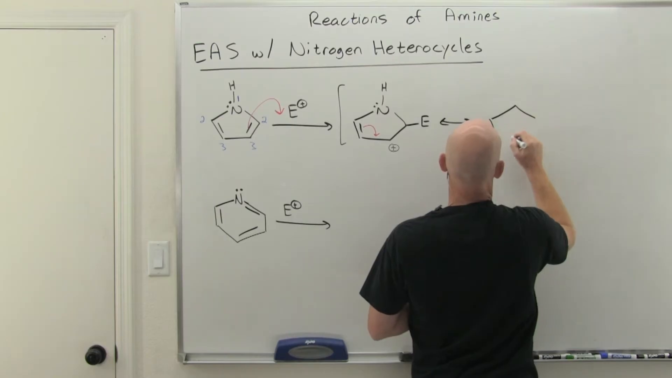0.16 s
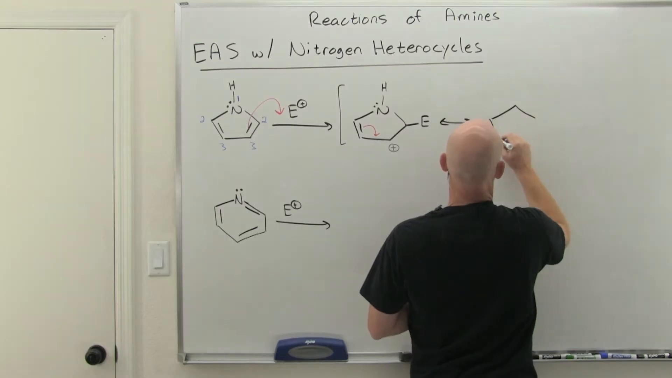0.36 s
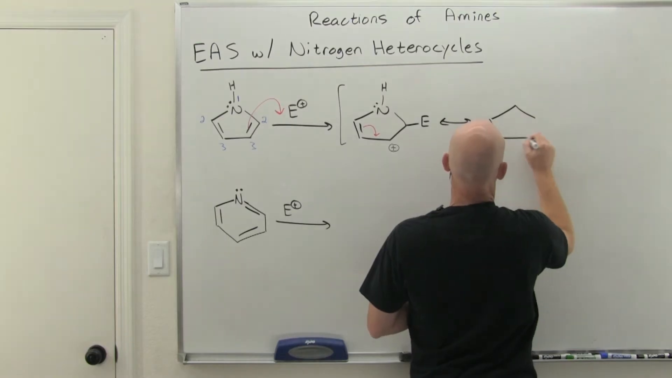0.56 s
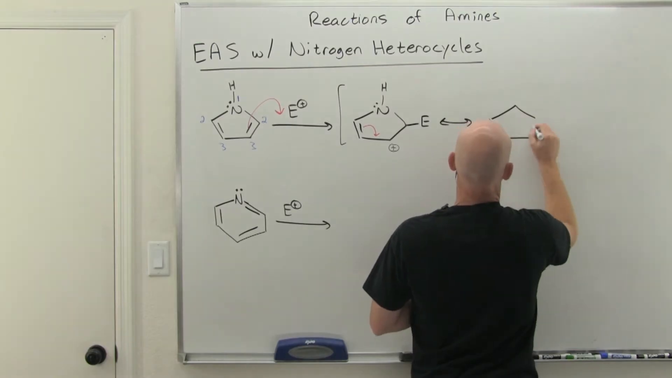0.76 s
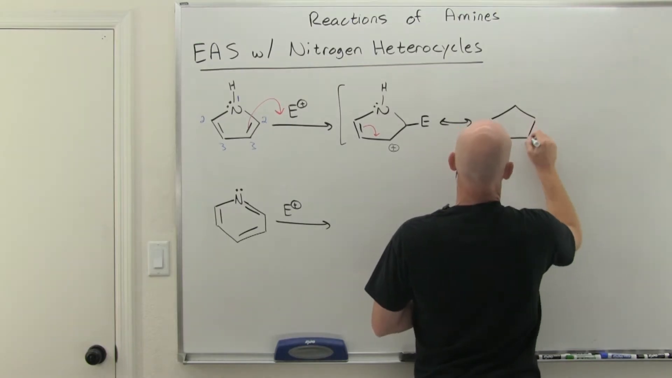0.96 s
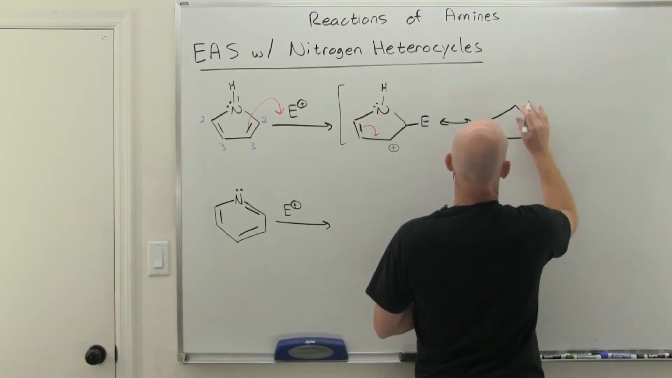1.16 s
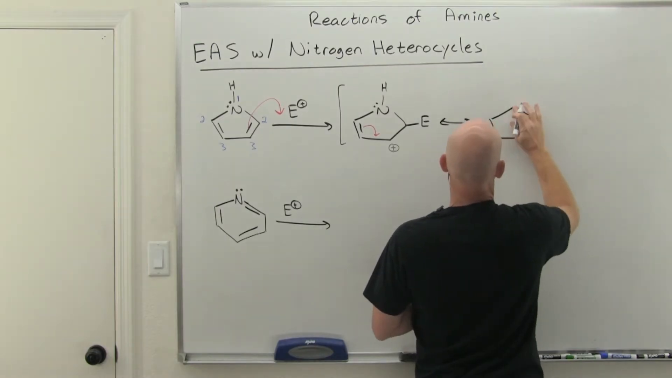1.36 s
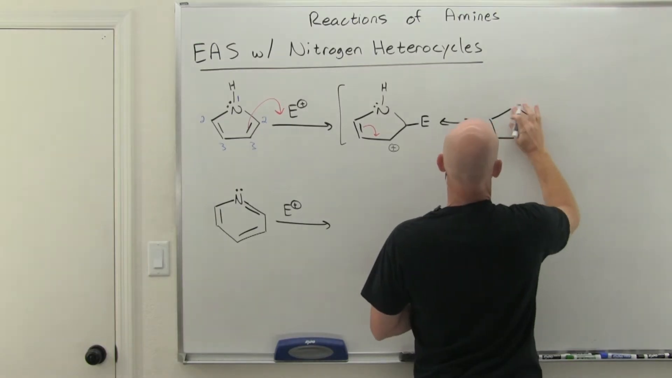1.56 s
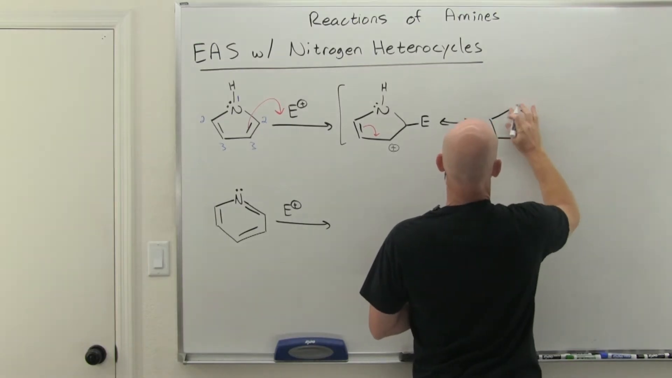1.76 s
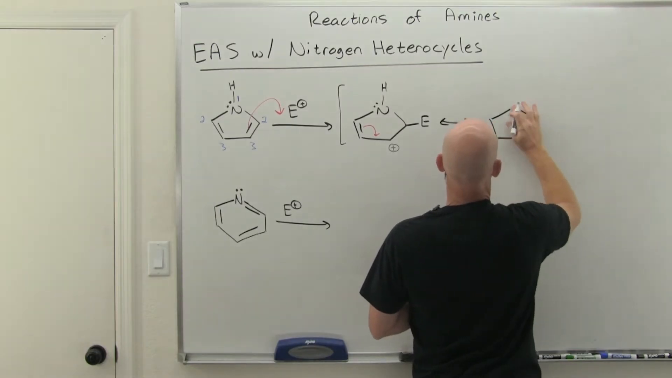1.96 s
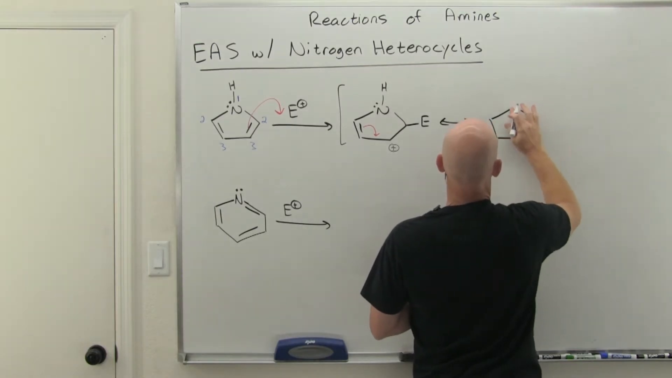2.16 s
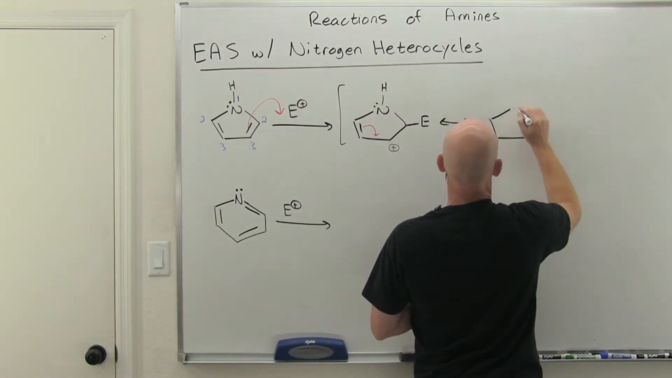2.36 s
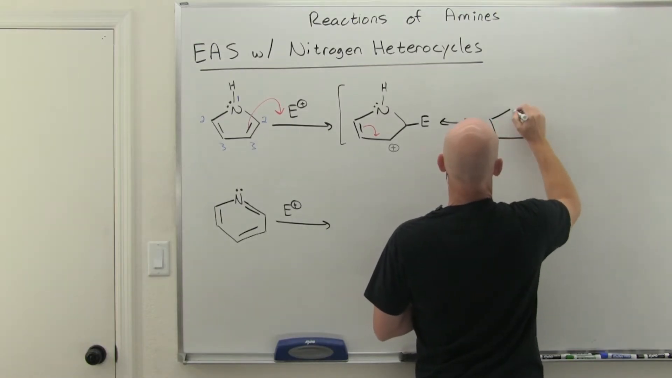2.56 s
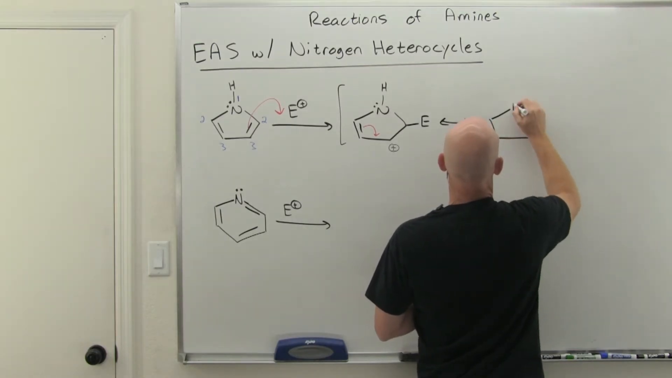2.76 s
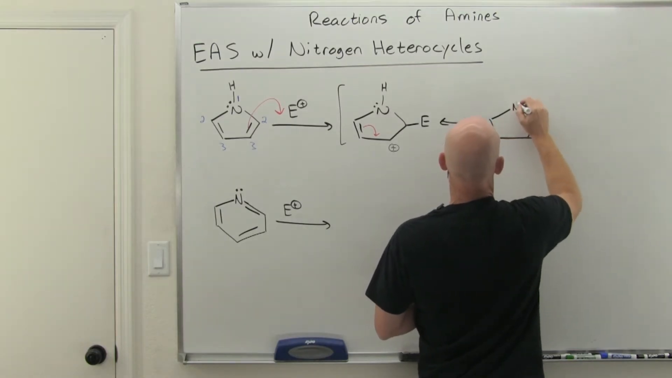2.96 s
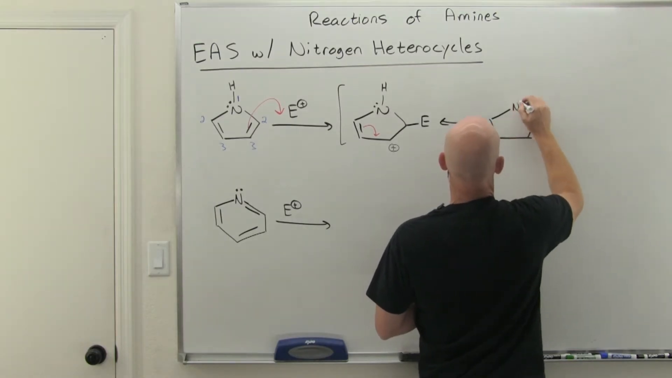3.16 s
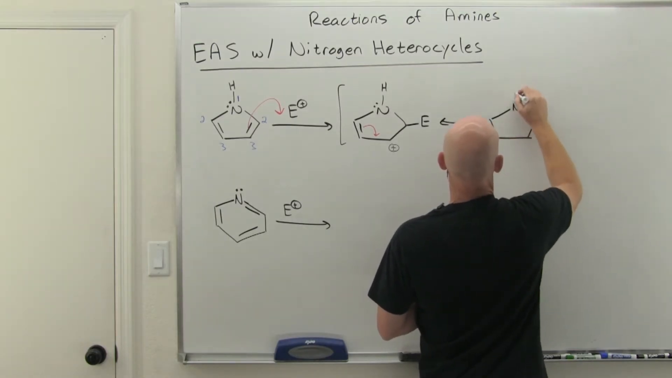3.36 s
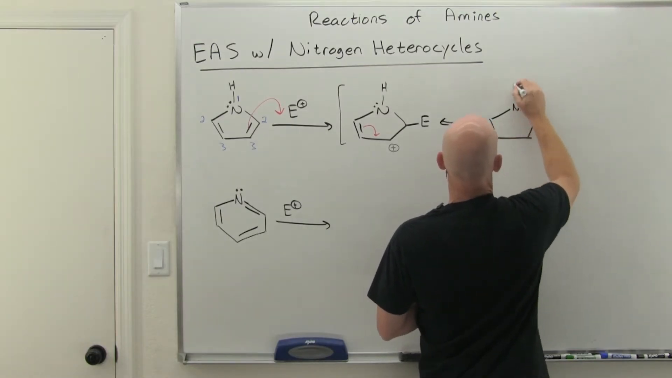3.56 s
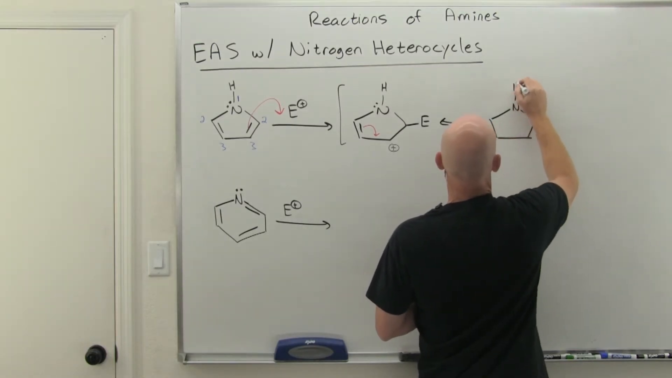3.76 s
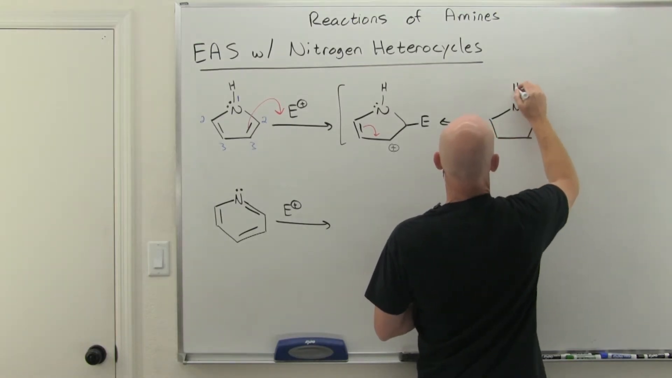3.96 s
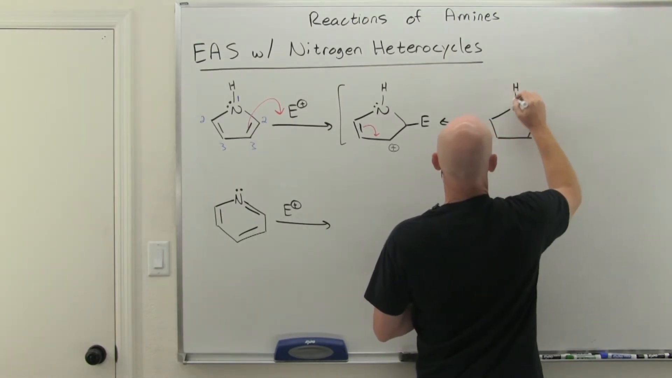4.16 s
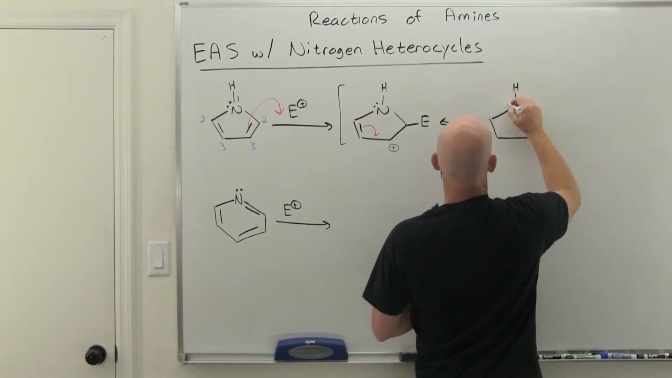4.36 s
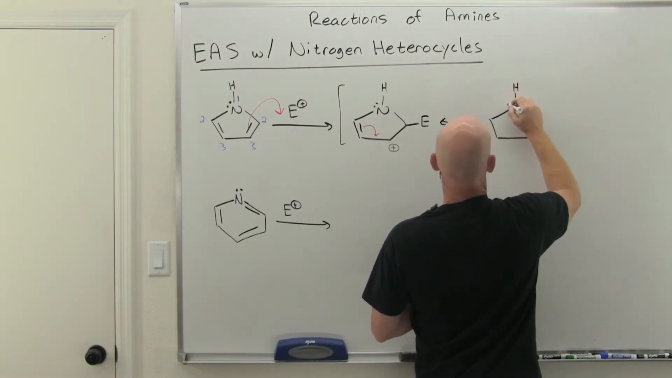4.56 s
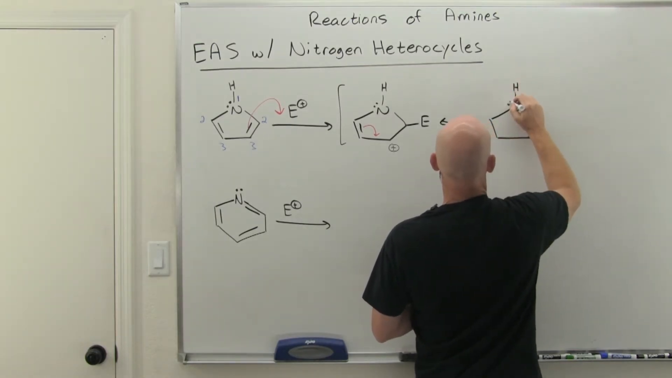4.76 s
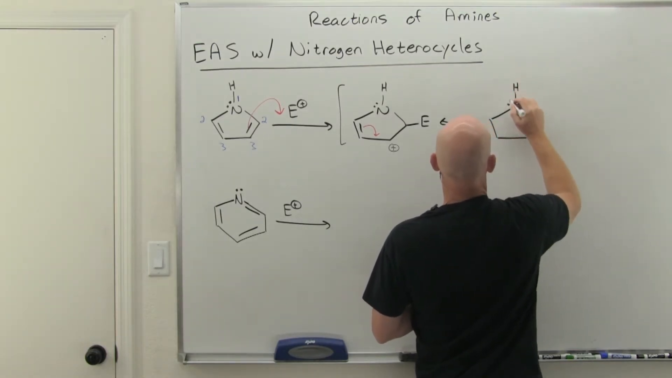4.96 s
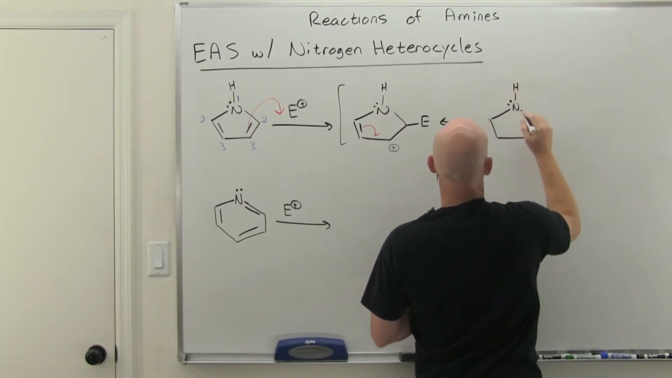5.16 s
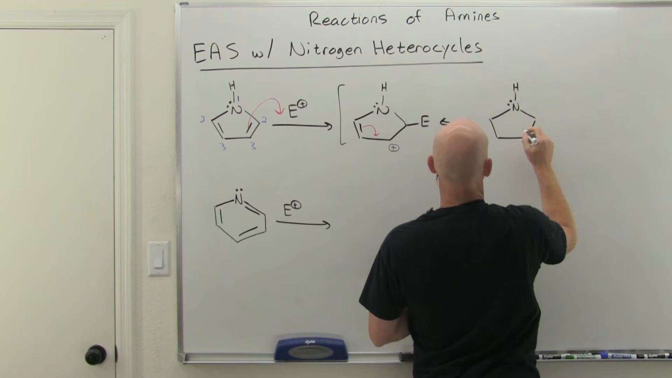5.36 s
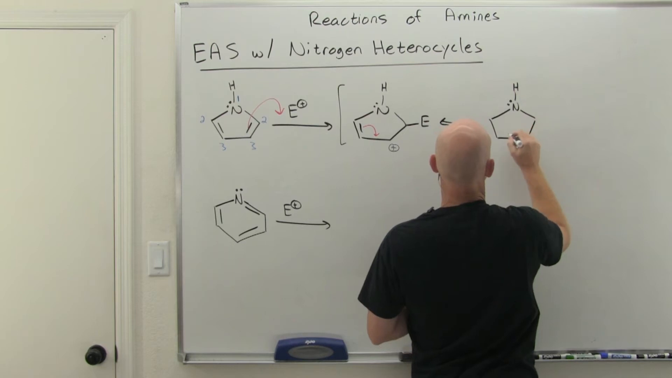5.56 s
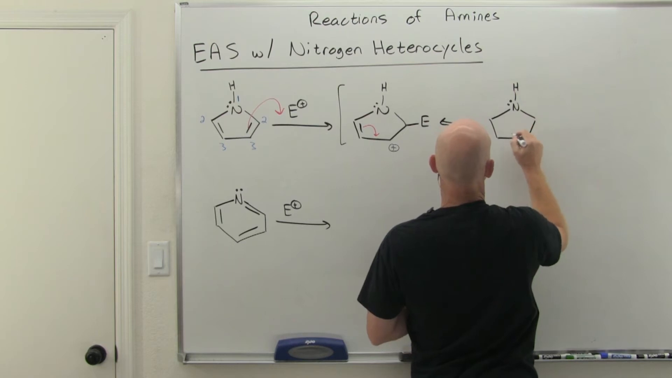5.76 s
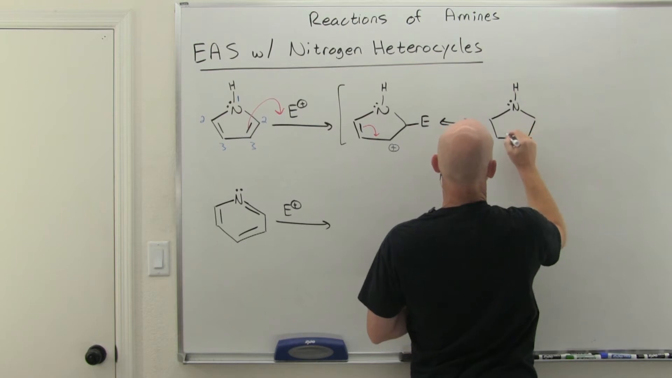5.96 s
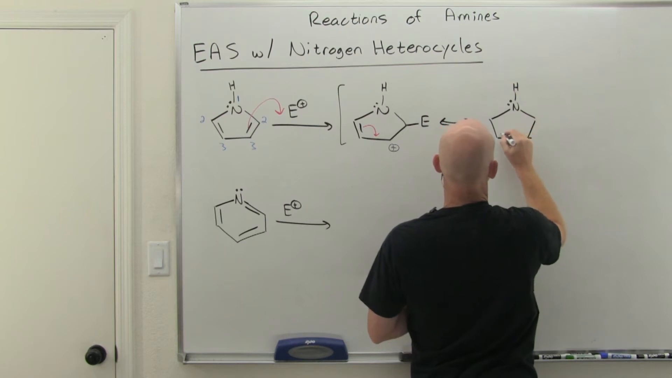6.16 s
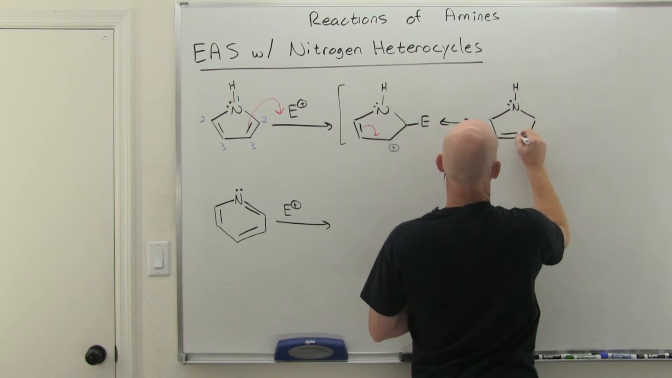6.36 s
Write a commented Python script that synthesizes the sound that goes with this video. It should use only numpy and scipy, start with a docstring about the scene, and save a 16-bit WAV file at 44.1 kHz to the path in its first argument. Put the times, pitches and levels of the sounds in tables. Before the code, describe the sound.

A quiet small room with steady, low ventilation rumble and a faint wavering hum, picked up in mono with brief reflections. At about 0.45 s a marker nib knocks on a hollow whiteboard, followed by a thin squeaky felt drag. A firmer knock comes at 0.9 s with a short hiss and a plastic click, then small clicks at 1.1 and 1.3 s. Only sparse light clicks follow at 1.9, 2.3 and 2.5 s. A hollow knock at 2.6 s leads into two faint rubbing strokes until 3 s. From 3.3 to 4.1 s, four knocks come quickly, mixed with tiny clicks and very brief scratches. Clicks at 4.2 and 4.35 s precede a softer, duller touch at 4.45 s, then a tap at 4.8 s and a click at 4.9 s. Mostly room air remains until a very gentle touch at 6.2 s and a clearer, squeaky hiss from 6.3 s.

```python
"""Marker on a whiteboard

A dry-erase marker draws short lines on a wall-mounted whiteboard in a small, quiet room.
Each touch of the felt nib is a half-sine push into the modes of the hollow panel, with echoes and room.
The pen's plastic clicks: short barrel rings with a bright edge as it is pressed, lifted and shifted.
The felt hisses faintly along each line: shaped noise that follows hand speed, plus some squeak.
Ventilation rumbles underneath: shaped noise and a wavering hum."""
import sys
import numpy as np
from scipy import signal
from scipy.fft import rfft, irfft, next_fast_len
from scipy.io import wavfile
from scipy.ndimage import map_coordinates

SR = 44100
rng = np.random.default_rng(int(sys.argv[2]) if len(sys.argv) > 2 else 0)


def transcribe(signal):
    """Save signal, clipped to [-1, 1], as a 16-bit WAV file at the path in sys.argv[1]."""
    frames = np.atleast_2d(signal).T
    limited = np.clip(frames, -1, 1)
    pcm = np.round(limited * 32767).astype(np.int16)
    wavfile.write(sys.argv[1], SR, pcm)


N = 283122
RING = SR * 3 // 4  # samples in one impulse response


def amp(db):
    """Decibels to gain."""
    return 10 ** (np.asarray(db) / 20)


def unit(x):
    """x at rms 1."""
    return x / np.sqrt(np.mean(x ** 2) + 1e-20)


def along(points, hz):
    """(Hz, value) points joined on a log-frequency axis."""
    point_hz, value = np.transpose(points)
    return np.interp(np.log(hz + 1), np.log(point_hz), value)


def wobble(knots_per_s):
    """Smooth random curve through evenly spaced knots."""
    knots = rng.standard_normal(int(N * knots_per_s / SR) + 4)
    return map_coordinates(knots, [np.arange(N) * knots_per_s / SR])


def filtered(x, response):
    """x times a complex response of frequency."""
    size = next_fast_len(len(x) + SR // 4)
    spectrum = rfft(x, size) * response(np.fft.rfftfreq(size, 1 / SR))
    return irfft(spectrum, size)[:len(x)]


def resonances(modes, hz):
    """Response of damped modes; each rings at its own level after a unit impulse."""
    s = 2j * np.pi * hz
    total = 0
    for mode_hz, level_db, t60_s in modes:
        decay_per_s = np.log(1000) / t60_s
        total = total + amp(level_db) * s / ((s + decay_per_s) ** 2 + (2 * np.pi * mode_hz) ** 2)
    return SR * total


def echoes(paths, hz):
    """Response of the direct sound plus delayed copies."""
    return 1 + sum(gain * np.exp(-2j * np.pi * hz * delay_s) for delay_s, gain in paths)


# room decay: pitch_hz, t60_s
ROOM_DECAY = [(100, 0.63), (500, 0.3), (1500, 0.25), (4200, 0.26), (8000, 0.17), (15000, 0.31)]


def room_tail(build_s):
    """Fresh diffuse noise tail of energy 1: builds up, then decays at a rate set by pitch."""
    hz, t, z = signal.stft(rng.standard_normal(RING), SR, nperseg=256)
    decay = amp(-60 * t / along(ROOM_DECAY, hz)[:, None])
    tail = signal.istft(z * decay, SR, nperseg=256)[1][:RING]
    tail = tail * (1 - np.exp(-(np.arange(RING) / SR / build_s) ** 2))
    return tail / np.linalg.norm(tail)


def in_room(x, wet_db, build_s):
    """x plus the diffuse room's answer."""
    return x + amp(wet_db) * signal.fftconvolve(x, room_tail(build_s))[:len(x)]


def add(track, start_s, sound):
    """Mix a sound into the track."""
    part = track[max(round(start_s * SR), 0):][:len(sound)]
    part += sound[:len(part)]


# nib landings: start_s, force_db, seat_wait_s (None: touch too light to seat the nib)
KNOCKS = [(0.4509, -13.5, 0.074), (0.917, -10, 0.0515), (2.6082, -12.5, 0.066), (3.3252, -11.5, 0.0257),
          (3.6197, -14, 0.065), (3.864, -11.5, 0.019), (4.0695, -12, 0.022), (4.456, -18.5, None),
          (4.7655, -15.5, 0.028), (6.2062, -22.5, None)]
# panel's first dead flex under the nib: pitch_hz, level_db, t60_s
FLEX_MODES = [(267, 1, 0.0032)]
# flex returning from frame and nearby surfaces: delay_s, gain
FLEX_ECHOES = [(0.003, 0.39), (0.0076, 0.58), (0.0115, 0.79), (0.0165, 0.64)]
# panel ringing, before per-knock variation: pitch_hz, level_db, t60_s
PANEL_MODES = [(35.9, -30.5, 0.56), (47, -32, 0.42), (70.2, -33.5, 0.43), (113.9, -34, 0.34),
               (137, -32.5, 0.27), (168.6, -30, 0.38), (233.8, -15.5, 0.23), (241.2, -23, 0.19),
               (274, -29, 0.28), (347, -24, 0.19), (407, -35.5, 0.16), (454, -18.5, 0.12),
               (518, -27.5, 0.21), (566.7, -25.5, 0.19), (689.3, -21.5, 0.24), (704.5, -16.5, 0.14),
               (732, -32, 0.36), (845, -25.5, 0.18), (944, -28.5, 0.34), (1050, -31, 0.24),
               (1250, -21, 0.21), (1495, -27, 0.21)]
BASS_LAG_HZ = 130  # long bending waves are slow: bass below this arrives late
# contact time at FIRM_DB; exponential growth rate per dB less force
FIRM_DB, CONTACT_S, CONTACT_GROWTH_PER_DB = -12, 0.0013, 0.0823


def knocks(flex_wet_db, skin_db, vary_db):
    """The nib strikes the panel; a firmer touch is shorter and reaches higher modes."""
    track, hz = np.zeros(N), np.fft.rfftfreq(RING, 1 / SR)
    skin = resonances([(2200, skin_db, 0.0017)], hz)  # dry tap of the enamel
    radiate = 1j * hz / (150 + 1j * hz)  # a local flex radiates little bass
    flex = (resonances(FLEX_MODES, hz) + skin) * radiate * echoes(FLEX_ECHOES, hz)
    modes = np.array([resonances([mode], hz) for mode in PANEL_MODES])
    bending = (1j * hz - BASS_LAG_HZ) / (1j * hz + BASS_LAG_HZ)  # allpass
    for start_s, force_db, _ in KNOCKS:
        contact_s = CONTACT_S * np.exp(CONTACT_GROWTH_PER_DB * (FIRM_DB - force_db))
        u = hz * contact_s
        # spectrum of the springy nib's half-sine push
        push = np.pi / 4 * (np.sinc(u - .5) + np.sinc(u + .5)) * np.exp(-1j * np.pi * u)
        thud = in_room(irfft(flex * push * bending, RING), flex_wet_db, build_s=0.0089)
        # each spot drives the modes a little differently
        shares = amp(vary_db * rng.standard_normal((len(PANEL_MODES), 1)))
        boom = irfft((shares * modes).sum(0) * push * bending, RING)
        add(track, start_s - contact_s / 2, amp(force_db) * (thud + boom))
    return filtered(track, lambda f: (f / 27) ** 6 / (1 + (f / 27) ** 6))  # highpass, 27 Hz


# plastic snaps: start_s, level_db, springs_back
CLICKS = [(0.9347, -43, False), (1.09, -43, True), (1.2684, -43, True), (1.871, -44.5, True),
          (2.2788, -43.5, True), (2.4647, -44.5, False), (3.4434, -45, False), (3.6318, -41.5, False),
          (3.7727, -45, False), (3.9891, -49.5, False), (4.0306, -59.5, False), (4.1776, -47.5, True),
          (4.353, -45.5, False), (4.9082, -47.5, False)]
SNAP_EDGE_DB, TICK_EDGE_DB = -12.5, -4.5  # bright edge re barrel ring: full snaps, light ticks
REBOUND_S, REBOUND_DB = 0.1003, -60  # faint tick a fixed time after the snap
SEAT_DB, SEAT_FADE_DB_PER_S = -53.5, 70  # seating tick, weaker the more slowly it is pressed home


def pen_contacts():
    """Rows start_s, level_db, edge_db: snaps, rebounds, and nib seatings after firm enough knocks."""
    snaps = [(start_s, level_db, SNAP_EDGE_DB) for start_s, level_db, _ in CLICKS]
    rebounds = [(start_s + REBOUND_S, REBOUND_DB, TICK_EDGE_DB)
                for start_s, _, springs_back in CLICKS if springs_back]
    seats = [(start_s + wait_s, SEAT_DB - SEAT_FADE_DB_PER_S * wait_s, TICK_EDGE_DB)
             for start_s, _, wait_s in KNOCKS if wait_s is not None]
    return snaps + rebounds + seats


def burst(response):
    """Impulse response at rms 1 over its first 10 ms."""
    x = irfft(response, RING)
    return x / np.sqrt(np.mean(x[:SR // 100] ** 2))


# pen barrel ringing, before radiation: pitch_hz, level_db, t60_s
BARREL_MODES = [(864, -12.5, 0.0052), (1308, -25.5, 0.023), (1530, -19, 0.013), (2170, -8, 0.003),
                (3210, -2.5, 0.0014), (3960, -18, 0.017), (4270, -6, 0.0013), (5180, -7, 0.0025),
                (6320, -25, 0.013)]
# click glancing off board, hand and head: delay_s, gain
CLICK_ECHOES = [(.0005, -0.14), (.0016, 0.44), (.0044, -0.026), (.0051, .42), (.0085, 0.55)]


def clicks(rattle_db, rattle_t60_s, wet_db):
    """Plastic snaps against plastic: a barrel ring and a bright edge, each with a tiny rattle."""
    track, hz, t = np.zeros(N), np.fft.rfftfreq(RING, 1 / SR), np.arange(RING) / SR
    low, high = 1j * hz / 750, 1j * hz / 6200
    radiate = low ** 2 / (1 + low + low ** 2)  # a thin pen radiates no bass
    barrel = resonances(BARREL_MODES, hz) * radiate / (1 + 2.0 * high + high ** 2)
    edge = resonances([(10200, 0, 0.00051)], hz) * radiate
    glances = echoes(CLICK_ECHOES, hz)
    for start_s, level_db, edge_db in pen_contacts():
        rattle = rng.standard_normal(RING) * amp(-60 * t / rattle_t60_s)
        rattle = amp(rattle_db) * rattle / np.linalg.norm(rattle)
        scatter = rattle + amp(wet_db) * room_tail(build_s=0.0013)
        paths = glances + rfft(scatter)
        click = burst(barrel * paths) + amp(edge_db) * burst(edge * paths)
        add(track, start_s, amp(level_db) * click)
    return track


# lines drawn: start_s, length_s, hiss_db, squeak_db (re hiss)
STROKES = [(0.47, 0.22, -63.5, 2.5), (0.936, 0.1, -61, -16), (2.688, 0.128, -65, -20),
           (2.82, 0.2, -64, -20), (3.353, 0.073, -64, -17), (3.64, 0.094, -65, -18),
           (3.875, 0.07, -61.5, -18), (4.082, 0.046, -63, -3), (4.815, 0.08, -68, -5), (6.335, 0.2, -58, 2)]
# felt on enamel, relative spectrum: pitch_hz, level_db_per_hz
FELT_SPECTRUM = [(1000, -11), (2500, -7.5), (3900, 0), (4900, -2), (5700, 1), (7000, -1.5), (9000, -1),
                 (11000, -3), (12500, -16), (16000, -15)]
# half-formed squeak, response is squared in use: pitch_hz, level_db (before squaring), t60_s (same)
SQUEAK_MODES = [(6900, -3.5, 0.0044), (7650, -6, 0.0036), (8750, 1.5, 0.0017)]
BRAKE_S = 0.057  # last stretch of a line, where the hand slows


def strokes(grain_db, wet_db):
    """Felt catches and slips on enamel, louder as the hand speeds up, with more or less squeak."""
    t, hiss, squeak = np.arange(N) / SR, np.zeros(N), np.zeros(N)
    for start_s, length_s, hiss_db, squeak_db in STROKES:
        brake_at_s = max(length_s - BRAKE_S, length_s / 10)
        speed = np.interp(t - start_s, [0, brake_at_s, length_s], [0, 1, 0])
        hiss = np.maximum(hiss, amp(hiss_db) * np.sqrt(speed))
        squeak = np.maximum(squeak, amp(hiss_db + squeak_db) * speed)
    rub = unit(filtered(rng.standard_normal(N), lambda hz: amp(along(FELT_SPECTRUM, hz))))
    nib = unit(filtered(rng.standard_normal(N), lambda hz: np.abs(resonances(SQUEAK_MODES, hz)) ** 2))
    # fibres catch quickly, finger pressure drifts slowly
    grip = unit(amp(grain_db * (wobble(400) + 0.79 * wobble(45))))
    return in_room((hiss * rub + squeak * nib) * grip, wet_db, build_s=0.0057)


# ventilation and microphone hiss, relative spectrum: pitch_hz, level_db_per_hz
AIR_SPECTRUM = [(11, -41), (18, -20), (43, -1), (91, -3), (121, -2.5), (143, -4.5), (185, -4), (219, -5.5),
                (387, -11), (486, -12.5), (834, -18.5), (2380, -31), (3170, -33.5), (14700, -39),
                (16000, -47)]
AIR_RMS_DB = -52.5
# ventilation hum: pitch_hz, level_db (rms, before waver)
HUM_TONES = [(120, -63)]


def ventilation(waver_db):
    """A steady rush of air over a hum slightly unsteady in level and phase."""
    t = np.arange(N) / SR
    rush = unit(filtered(rng.standard_normal(N), lambda hz: amp(along(AIR_SPECTRUM, hz))))
    hum = np.zeros(N)
    for pitch_hz, level_db in HUM_TONES:
        level = amp(level_db + waver_db * wobble(2.2)) * np.sqrt(2)
        hum += level * np.sin(2 * np.pi * pitch_hz * t + .5 * wobble(3.1))
    return amp(AIR_RMS_DB) * rush + hum


def scene():
    """Board, pen, felt and ventilation summed to one channel."""
    board = knocks(flex_wet_db=-7.0, skin_db=2.0, vary_db=2.5)
    pen = clicks(rattle_db=2.5, rattle_t60_s=0.026, wet_db=1.5)
    felt = strokes(grain_db=1.5, wet_db=-7.0)
    air = ventilation(waver_db=-2.5)
    return (board + pen + felt + air)[None]


TOP_HZ = 16300


def record(dry):
    """Band limit: nothing from TOP_HZ up."""
    return filtered(dry[0], lambda hz: hz < TOP_HZ)[None]


dry = scene()
out = record(dry)
transcribe(out)
```